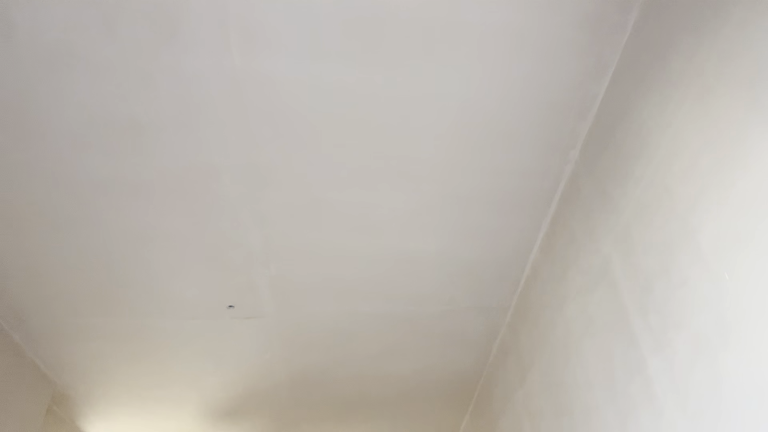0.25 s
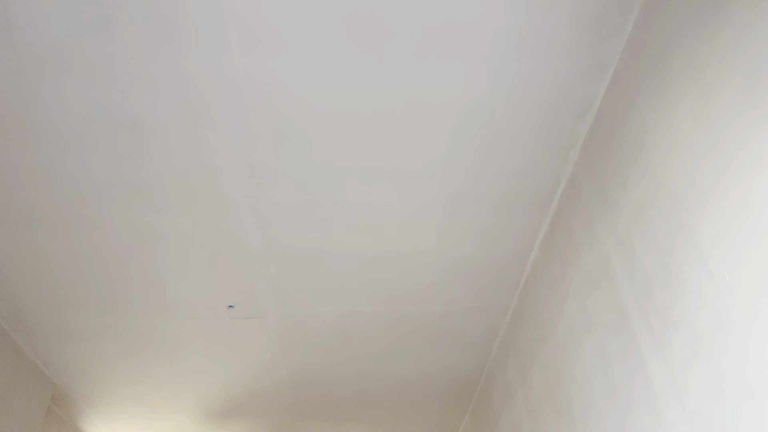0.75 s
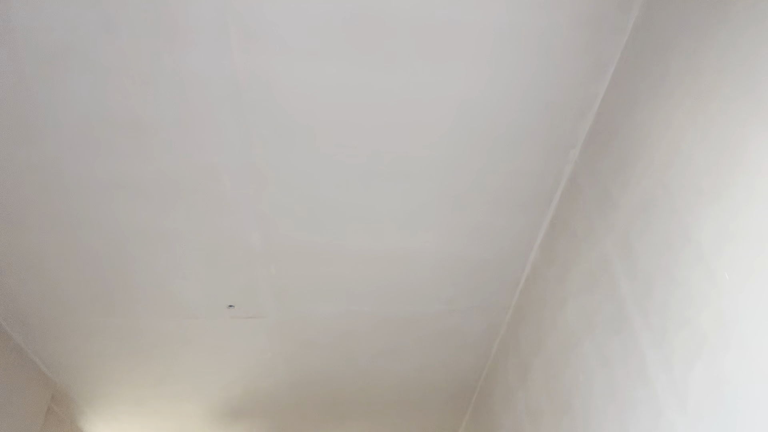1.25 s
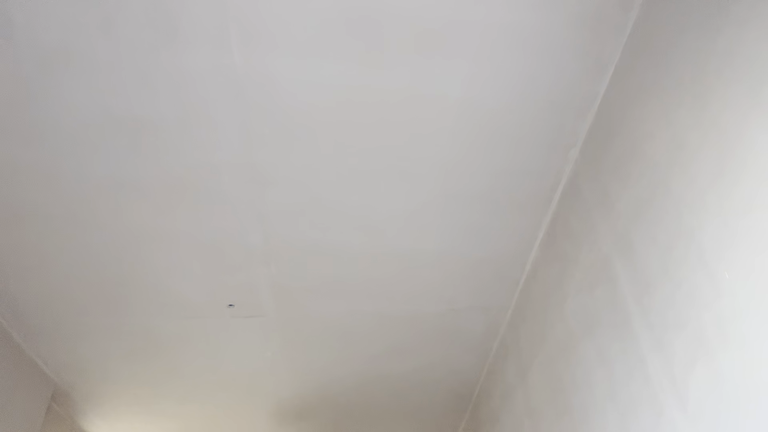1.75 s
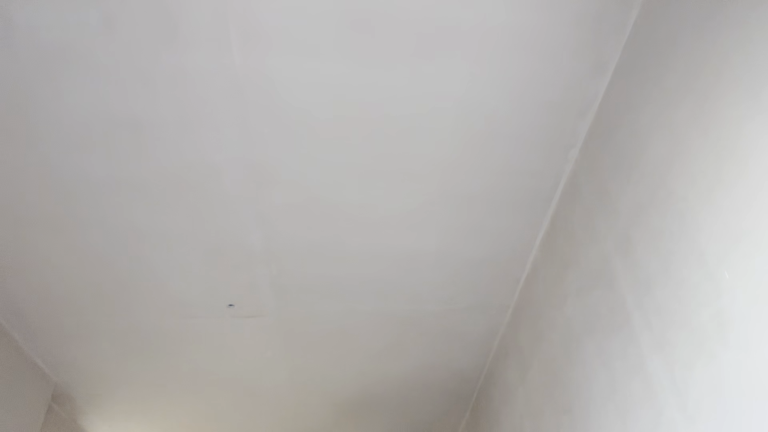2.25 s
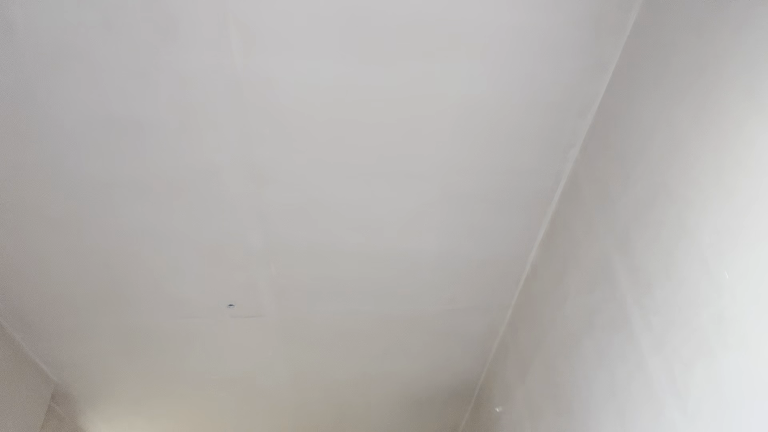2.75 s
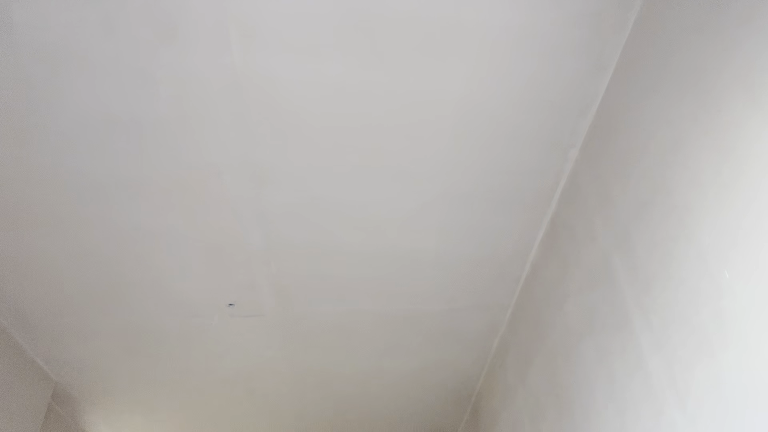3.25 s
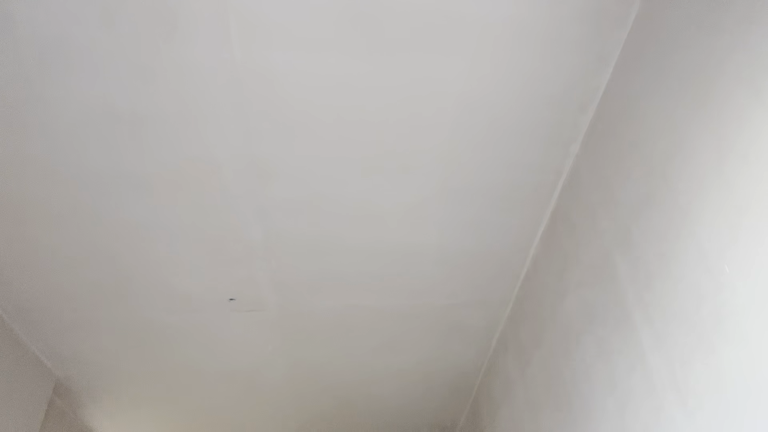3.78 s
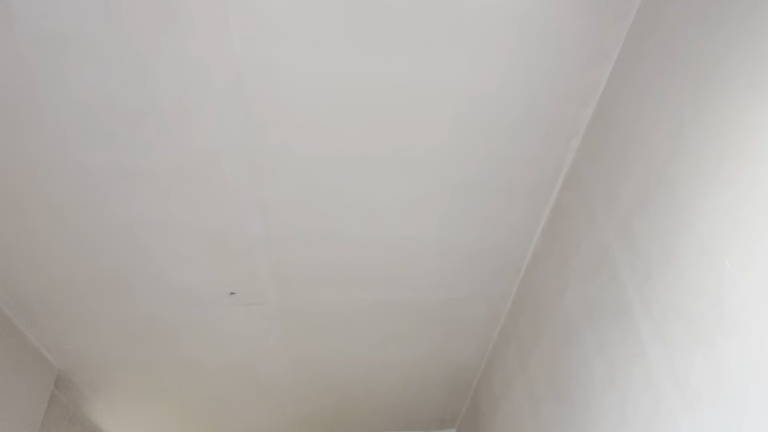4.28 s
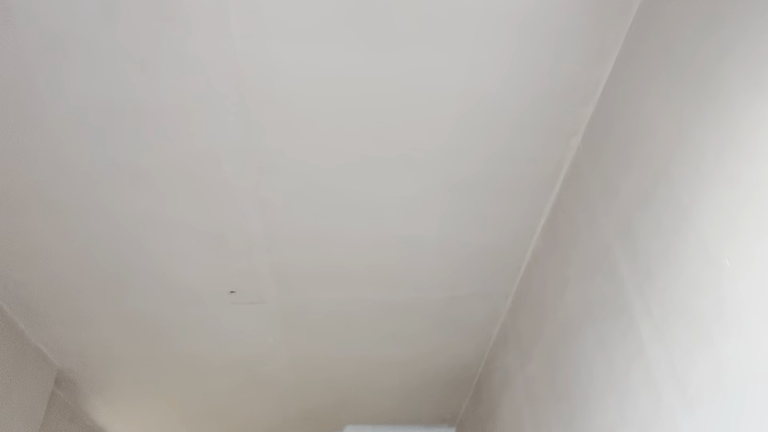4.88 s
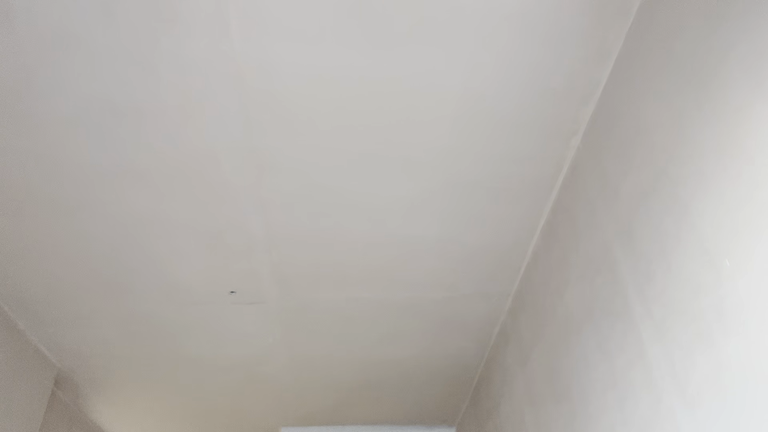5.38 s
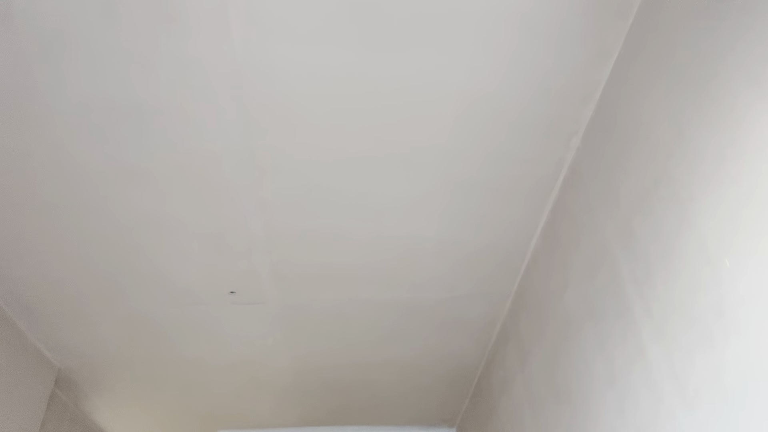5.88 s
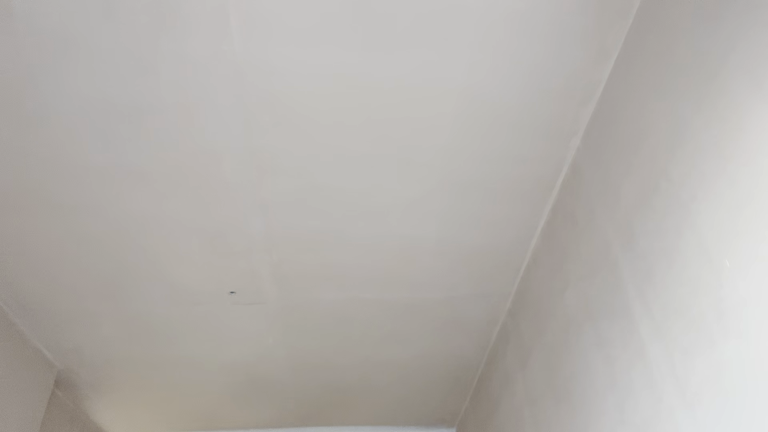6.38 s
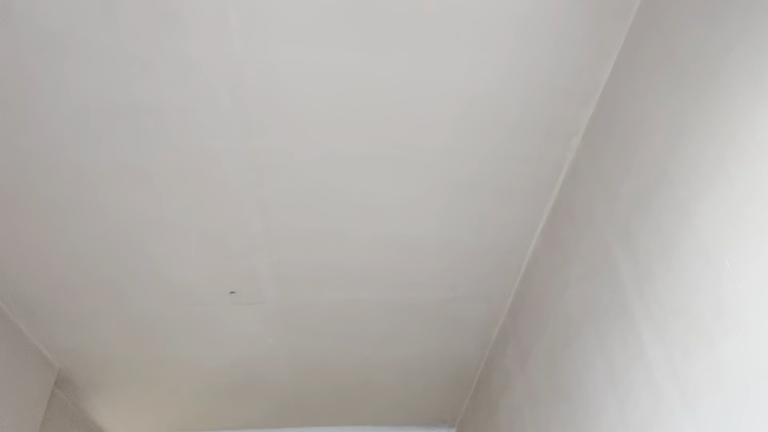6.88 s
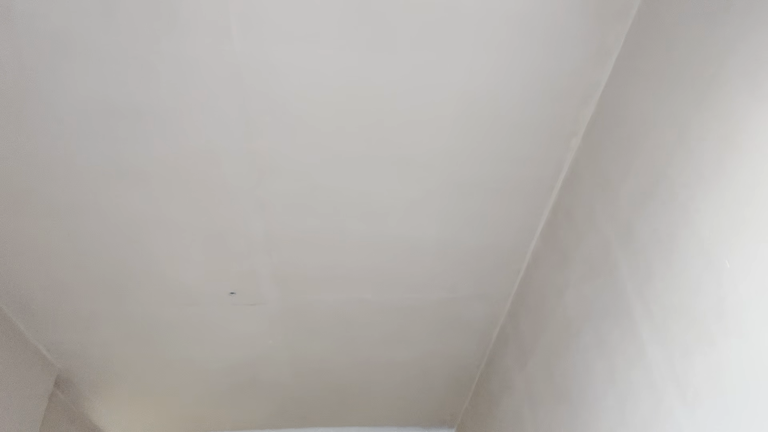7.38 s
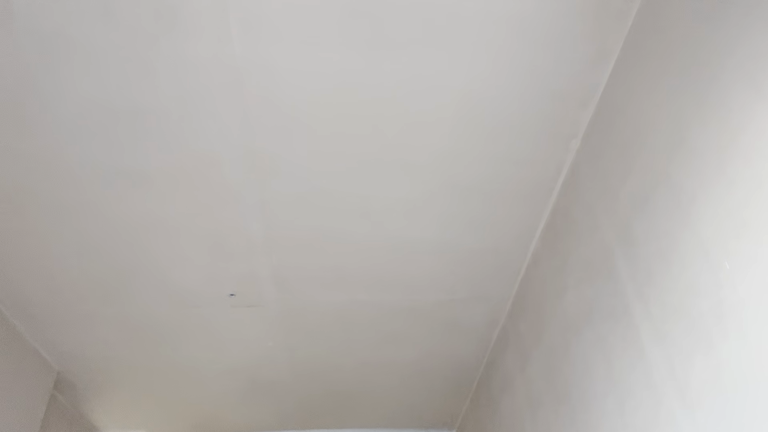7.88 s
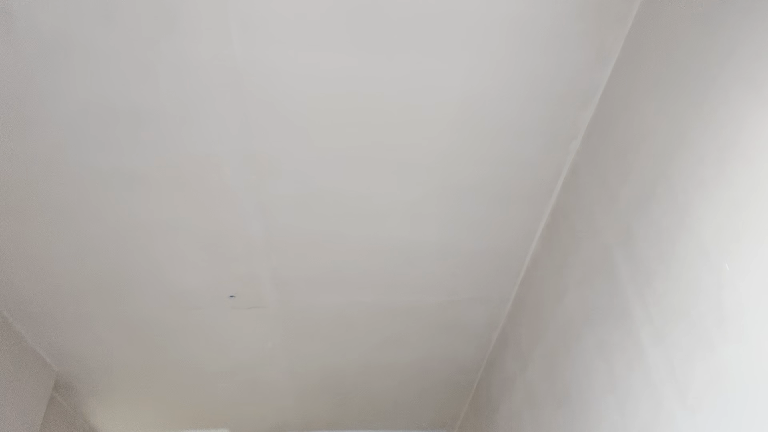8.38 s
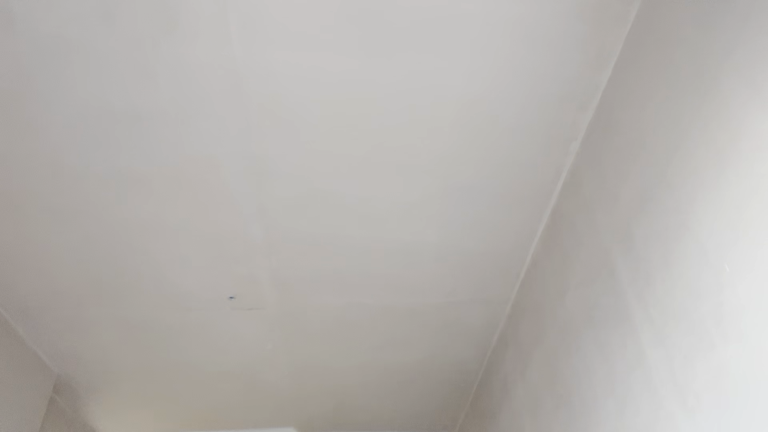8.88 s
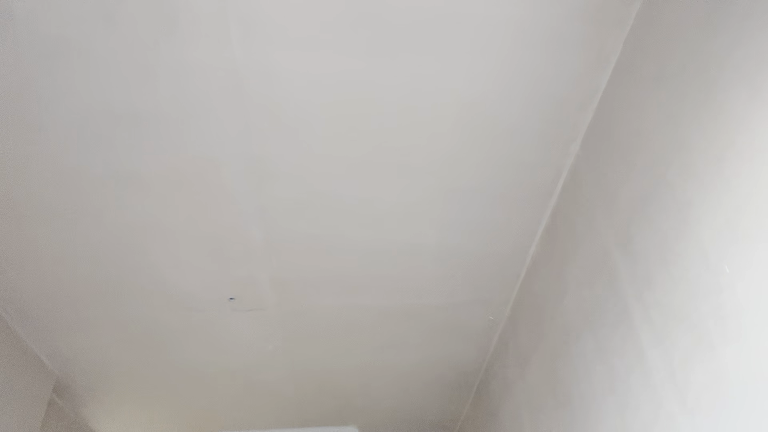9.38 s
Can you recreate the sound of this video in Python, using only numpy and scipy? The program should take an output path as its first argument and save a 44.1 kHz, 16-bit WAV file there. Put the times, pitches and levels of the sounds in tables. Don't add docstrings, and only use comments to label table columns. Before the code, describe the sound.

Strong airy high-pressure hiss, mostly high treble with little body, already running at the start and never stopping for long. Three blink-length dips mark the trigger being released and pressed as the gun turns. A more distant motor pump gives a thin mid whine, clearer in the last two seconds. Irregular soft wind buffets the microphone until about eight seconds, then one dull bump sounds. Empty room, short bright echo.

```python
import sys
import numpy as np
from scipy import signal
from scipy.fft import rfft, irfft, next_fast_len
from scipy.io import wavfile
from scipy.ndimage import uniform_filter1d

SR = 44100
rng = np.random.default_rng(int(sys.argv[2]) if len(sys.argv) > 2 else 0)


def pcm_store(signal):
    levels = np.round(np.clip(np.atleast_2d(signal), -1, 1) * 32767)
    wavfile.write(sys.argv[1], SR, levels.astype(np.int16).T)


def voltage_ratio(level):
    return 10 ** (np.asarray(level, float) / 20)


N = 425124
SIZE, HOP = 1024, 256
BINS = np.fft.rfftfreq(SIZE, 1 / SR)
TIMES = np.arange(N // HOP + 5) * HOP / SR


def evened(x):
    return x / np.sqrt(np.mean(x ** 2) + 1e-20)


def at_hz(points, hz, order=1):
    columns = np.transpose(points)
    return np.interp(np.log(hz + 1), np.log(columns[0] + 1), columns[order])


def at_time(rows, t):
    time_s, level_db = np.transpose(rows)
    return np.interp(t, time_s, level_db)


def white_spectra():
    shape = len(TIMES), len(BINS)
    return (rng.standard_normal(shape) + 1j * rng.standard_normal(shape)).T


def to_samples(z):
    return signal.istft(z, nperseg=SIZE, noverlap=SIZE - HOP)[1][..., :N]


def drift(frames, bins):
    patches = uniform_filter1d(white_spectra().real, size=bins, axis=0)
    return evened(uniform_filter1d(patches, size=frames, axis=1))


# time_s, level_db
SPRAY_LEVEL = [(0.0, -24.5), (1.0, -27), (1.8, -25.5), (3.9, -26.5), (4.45, -27), (5.05, -26.5), (6.7, -27),
               (7.6, -28), (7.9, -27), (9.64, -26.5)]
# frequency_hz, density_db (per Hz)
JET_SPECTRUM = [(600, -26), (1900, -14.5), (2520, -15.5), (3020, -9), (4100, -9.6), (5000, -7), (6000, -3),
                (6800, 0), (7300, -.8), (8200, .4), (9800, -2.4), (11800, -.6), (13000, -1.9), (15600, -3)]
# frequency_hz, likeness (0-1), right_phase_rad
PORT_COHERENCE = [(300, .5, 3), (1500, .5, 3), (2000, .25, 0), (3200, .1, 3), (5000, .12, -1.5),
                  (6500, .5, -1.7), (7100, .52, -1.85), (8000, .88, -2.05), (9500, .88, -2.6),
                  (12500, .88, -3.68), (14000, .88, -4.3), (15600, .86, -5.1)]
# frequency_hz, left_minus_right_db
PORT_TILT = [(300, 1), (800, 0), (1300, 3), (2400, 3), (3200, 1), (5800, -.3), (7100, 4.3), (8500, 2),
             (9700, 0), (15500, 0)]


def jet():
    same = np.clip(at_hz(PORT_COHERENCE, BINS), 0, 1)[:, None]
    phase = np.exp(1j * at_hz(PORT_COHERENCE, BINS, order=2))[:, None]
    left = white_spectra()
    right = same * phase * left + np.sqrt(1 - same ** 2) * white_spectra()
    tilt_db = np.outer([.5, -.5], at_hz(PORT_TILT, BINS))
    z = np.array([left, right]) * voltage_ratio(at_hz(JET_SPECTRUM, BINS) + tilt_db)[..., None]
    flicker_db = 0.36 * drift(5, 400) + 0.37 * drift(14, 16)
    flicker_db += 1.1 * drift(40, 3)
    distance = voltage_ratio(at_time(SPRAY_LEVEL, TIMES))
    z *= voltage_ratio(flicker_db) * distance
    scale = np.sqrt(np.mean(to_samples(z / distance) ** 2))
    return voltage_ratio(9.5) * to_samples(z * np.sqrt(trigger())) / scale


# off_s, on_s, hiss_left (amplitude share 0-1)
TRIGGER_TURNS = [
    (1.128, 1.191, 0),
    (4.269, 4.361, 0.17),
    (7.508, 7.579, 0.35),
]
# frequency_hz, t60_s
ROOM_DECAY = [(500, .6), (3000, 0.75), (8000, 0.42), (15000, 0.17)]


def trigger():
    valve = np.ones(len(TIMES))
    for off_s, on_s, left in TRIGGER_TURNS:
        inside_s = np.minimum(TIMES - off_s, on_s - TIMES)
        valve -= (1 - left ** 2) * np.clip(inside_s * SR / HOP + .5, 0, 1)
    fall = voltage_ratio(-120 * HOP / SR / at_hz(ROOM_DECAY, BINS))
    power, history = np.ones(len(BINS)), []
    for opening in valve:
        keep = fall if opening < .5 else fall ** 1.3
        power = keep * power + (1 - keep) * opening
        history.append(power)
    return np.transpose(history)


# time_s, whine_db
PUMP_LEVEL = [(0, -39.5), (.7, -41.5), (2, -41), (2.7, -40), (4.5, -41.5), (7.9, -42.5), (8.3, -39.5),
              (9.1, -38), (9.64, -38.5)]
# frequency_hz, level_db, left_minus_right_db
MOTOR_LINES = [(73.6, 0, 0), (97, -3, 0), (147.2, -2, 2), (220.8, -3, 5), (318, 0, 8), (468, -10, 3),
               (660, -10, 3), (710, -7, 2)]
# frequency_hz, width_hz, level_db, left_minus_right_db
HOUSING_MODES = [(790, 250, 1, 0), (1080, 450, -2, 1), (1620, 350, -6, 2), (680, 60, -3, 2),
                 (855, 30, 0, 0), (1185, 12, 3, 5), (1260, 14, 3, 5), (1305, 60, 1.5, 5), (1362, 25, 3, 3),
                 (1538, 30, 1, 3), (1630, 30, -1, 4), (1950, 250, -4, 3)]


def pump():
    t = np.arange(N) / SR
    clear = np.clip((t - 7.5) / (10.3 - 7.5), 0, 1)
    size = next_fast_len(N)
    hz, sides = np.fft.rfftfreq(size, 1 / SR), np.array([[.5], [-.5]])
    shape = 0
    for f, width_hz, db, pan_db in HOUSING_MODES:
        shape = shape + voltage_ratio(2 * (db + pan_db * sides)) / (1 + (2 * (hz - f) / width_hz) ** 2) ** 2
    a, b = rfft(rng.standard_normal((2, size)))
    opposed = .42
    gears = np.array([a, -opposed * a + np.sqrt(1 - opposed ** 2) * b])
    whine = irfft(np.sqrt(shape) * gears, size)[:, :N]
    panel_hz, panel_width_hz, panel_db = 600, 280, -7
    panel_shape = 1 / (1 + (2 * (hz - panel_hz) / panel_width_hz) ** 2) ** 2
    panel = irfft(rfft(rng.standard_normal((2, size))) * panel_shape, size)[:, :N]
    hum, lag_s = 0, .0008
    for f, db, pan_db in MOTOR_LINES:
        waver_db = 2.0 * np.interp(t, TIMES, drift(30, 1)[0])
        cycles = f * (t + lag_s * sides) + rng.random()
        hum = hum + voltage_ratio(db + pan_db * sides + waver_db) * np.sin(2 * np.pi * cycles)
    body = evened(whine) + voltage_ratio(panel_db) * clear * evened(panel)
    hum_db = -22 + 12.5 * clear
    return voltage_ratio(at_time(PUMP_LEVEL, t) + 2.5) * (body + voltage_ratio(hum_db) * hum)


# frequency_hz, level_db, t60_s, rise_s
KNOCK_MODES = [
    (257, 6, 0.17, 0.0029),
    (93.3, 4, 0.83, 0.03),
    (147.4, 4, 1.3, 0.078),
    (356, -1.5, 0.12, 0.0055),
]


def knock():
    start_s, level_db = 9.342, -32.5
    t = np.maximum(np.arange(N) / SR - start_s, 0)
    ring = 0
    for hz, db, t60_s, rise_s in KNOCK_MODES:
        envelope = voltage_ratio(db - 60 * t / t60_s) * np.minimum(t / rise_s, 1)
        ring = ring + envelope * np.sin(2 * np.pi * hz * t)
    return voltage_ratio(level_db + np.array([[2.2], [-2.2]])) * ring


# time_s, level_db
DRAUGHT_LEVEL = [(0, -44.5), (.6, -46.5), (.75, -52), (1.05, -41), (1.4, -40.5), (1.95, -42.5), (2.4, -41),
                 (3, -41), (4, -37.5), (4.7, -35.5), (5.2, -41), (5.8, -41), (7.2, -41), (7.75, -50.5),
                 (8.3, -55.5), (8.7, -57.5), (9.64, -62)]
# peak_s, level_db, dying_s
GUST_EVENTS = [(.06, -45, 0.22), (.4, -43.5, .1), (.83, -48, .1), (1.17, -36.5, 0.17), (1.73, -41, 0.089),
               (2.01, -35.5, 0.017), (2.11, -40, .15), (2.5, -33, .15), (2.63, -31.5, 0.18),
               (2.96, -35.5, 0.035), (3.11, -39, 0.18), (3.32, -32, .15), (3.56, -32.5, 0.041),
               (3.69, -38, 0.19), (3.97, -35, 0.21), (4.23, -33.5, 0.14), (4.45, -34, 0.05),
               (4.77, -33.5, 0.077), (5.28, -37.5, .1), (5.46, -35, .05), (5.63, -36.5, 0.036),
               (6.06, -38.5, 0.12), (6.28, -37, .2), (6.58, -39, .1), (6.78, -36.5, .05), (6.95, -44, .15),
               (7.19, -44, 0.065), (7.36, -38, 0.21), (7.66, -42, 0.08), (7.9, -48, 0.055)]
# peak_s, level_db, dying_s
KNOCK_PUSH = [
    (9.39, -31, .17),
]
# frequency_hz, density_db (per Hz)
RUMBLE_SPECTRUM = [(20, -37.5), (30, -21.5), (45, -3.5), (60, 0), (80, -1.5), (110, -3), (150, -8),
                   (220, -13), (300, -27.5)]
# frequency_hz, density_db (per Hz)
FLUTTER_SPECTRUM = [(120, -32.5), (180, -4.5), (260, -2), (340, -3.5), (500, -4), (620, -9), (1000, -51)]


def wind():
    t = np.arange(N) / SR
    lumps_db = 0.78 * np.interp(t, TIMES, drift(8, 1)[0])
    steady = voltage_ratio(2 * at_time(DRAUGHT_LEVEL, TIMES))
    rumble_power = steady + gusts(GUST_EVENTS) + gusts(KNOCK_PUSH)
    flutter_power = voltage_ratio(2 * -13.5) * (gusts(GUST_EVENTS, quick=.7) + steady)
    flutter_power += voltage_ratio(2 * (at_time(PUMP_LEVEL, TIMES) - 13))
    rumble = voltage_ratio(2.0) * np.interp(t, TIMES, np.sqrt(rumble_power)) * coloured(RUMBLE_SPECTRUM, 0.84)
    flutter = np.interp(t, TIMES, np.sqrt(flutter_power)) * coloured(FLUTTER_SPECTRUM, 0.66)
    return voltage_ratio(lumps_db) * (rumble + flutter)


def gusts(rows, quick=1):
    peak_s, db, dying_s = np.transpose(rows)
    late_s = TIMES[:, None] - peak_s
    swell = (np.minimum(late_s, 0) / .04) ** 2
    decay = late_s / (quick * dying_s)
    return (voltage_ratio(db - 10 * np.maximum(decay, swell)) ** 2).sum(axis=1)


def coloured(points, same):
    size = next_fast_len(N)
    a, b = rfft(rng.standard_normal((2, size)))
    pair = np.array([a, same * a + np.sqrt(1 - min(same ** 2, 1)) * b])
    density = voltage_ratio(at_hz(points, np.fft.rfftfreq(size, 1 / SR)))
    return evened(irfft(density * pair, size)[:, :N])


def scene():
    return jet() + pump() + wind() + knock()


def guard_hz(t):
    on_s, off_s, rise_s, fall_s = 0.4, 8.1, 1.25, 0.76
    open_hz, shut_hz = 25, 305
    shut = 1 - np.exp(-np.maximum(t - on_s, 0) / rise_s)
    release = np.exp(-(np.maximum(t - off_s, 0) / fall_s) ** 2)
    slipping = 1. * (rng.random(len(t)) < .1 / 3)
    slip = 1 - .27 * uniform_filter1d(slipping, size=3) * 3
    return np.clip(slip, .3, 1) * (open_hz + shut_hz * shut * release)


def top_cut(x):
    return signal.sosfilt(signal.butter(12, 15730, fs=SR, output="sos"), x)


TOP_SLICES = [3.7, 3.84, 3.97, 4.44, 4.6, 4.73, 4.88, 5.78, 6.03, 7.6, 7.92, 8.42, 9.49, 9.56]
# time_s, low_hz, high_hz
LOW_SLICES = [
    (.37, 9680, 10400),
    (.49, 9680, 10050),
    (3.11, 9680, 10050),
    (3.48, 10250, 11800),
    (3.74, 9680, 11100),
    (8.05, 9680, 11150),
]


def record(dry):
    long, overlap = 2048, 1536
    gap_low_hz, gap_high_hz, top_hz = 9680, 12350, 11900
    hz, t, z = signal.stft(dry, SR, nperseg=long, noverlap=overlap)
    mid, side = (z[0] + z[1]) / 2, (z[0] - z[1]) / 2
    side = side / (1 + (guard_hz(t) / (hz[:, None] + 1)) ** 12)
    widen_hz = 90 * rng.exponential(1, (len(t) // 2 + 1, 2)).repeat(2, axis=0)[:len(t)]
    below = hz[:, None] < gap_low_hz - widen_hz[:, 0]
    above = hz[:, None] > gap_high_hz + widen_hz[:, 1]
    kept = 1. * (below | above)
    slices = list(LOW_SLICES) + [(s, top_hz, gap_high_hz) for s in TOP_SLICES]
    for s, low_hz, high_hz in slices:
        slot_s = (np.round((s * SR - 915) / 1024) * 1024 + 915) / SR
        level_db = 8.5 if low_hz >= top_hz else 13
        band = (hz >= low_hz) & (hz <= high_hz)
        kept += voltage_ratio(level_db) * np.outer(band, abs(t - slot_s) <= long / 8 / SR)
    z = np.array([mid * kept + side, mid * kept - side]) * (hz < 15800)[:, None]
    mix = signal.istft(z, SR, nperseg=long, noverlap=overlap)[1][:, :N]
    return top_cut(mix)


dry = scene()
out = record(dry)
pcm_store(out)
```